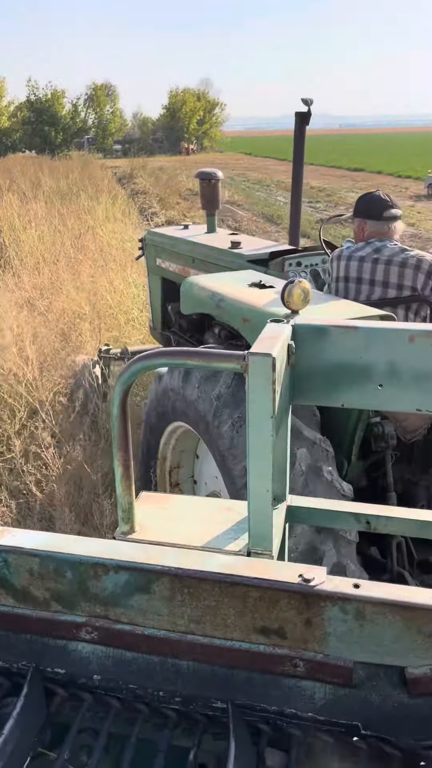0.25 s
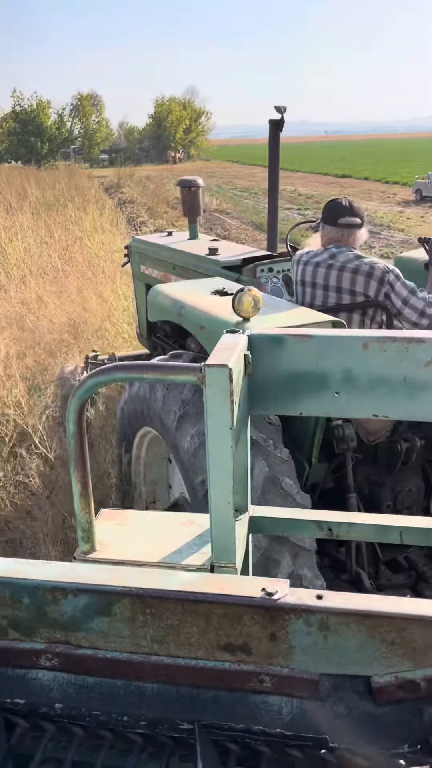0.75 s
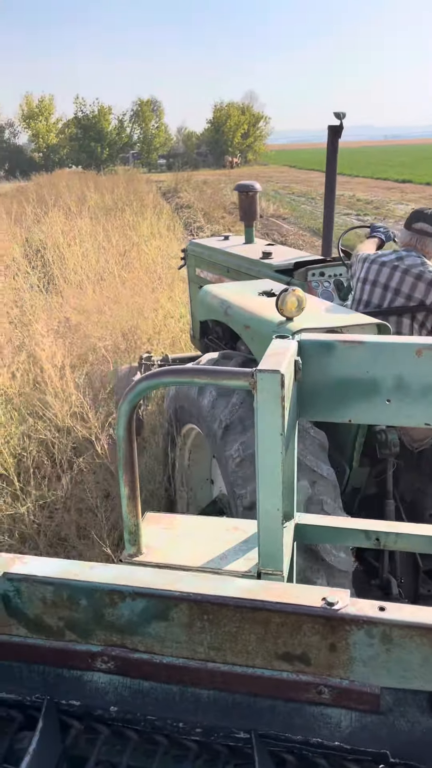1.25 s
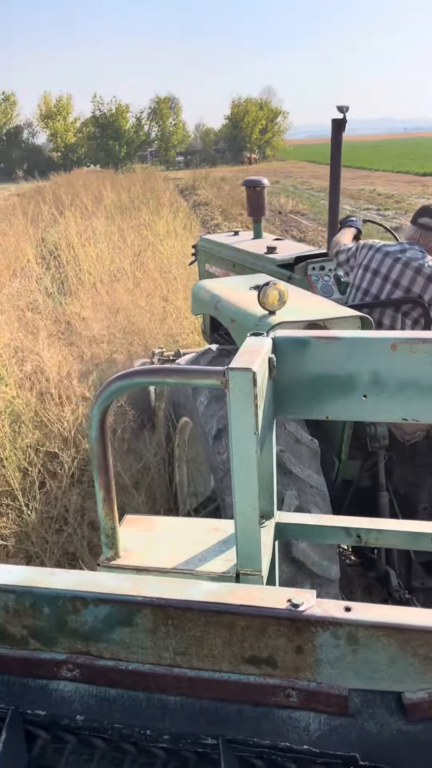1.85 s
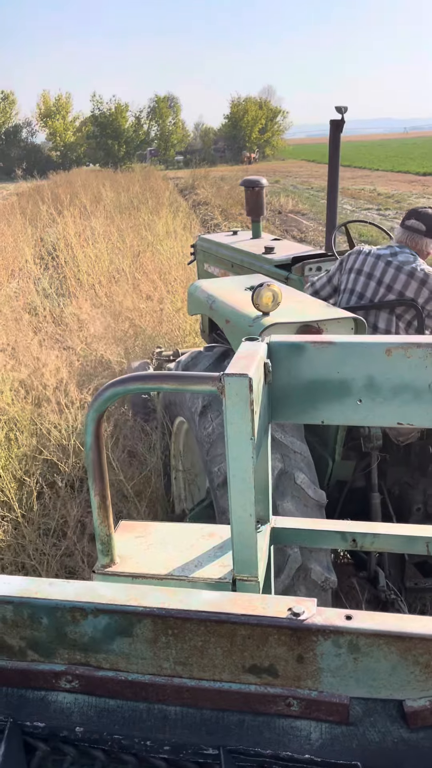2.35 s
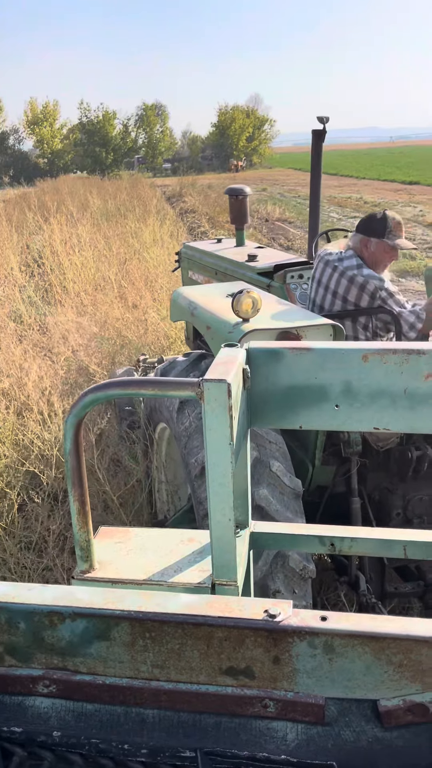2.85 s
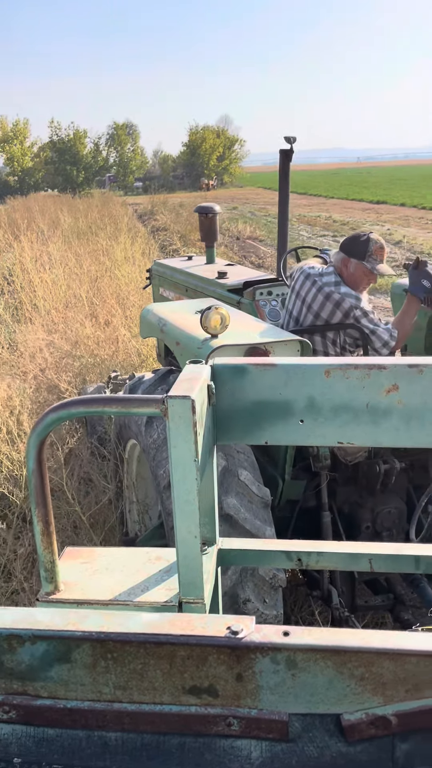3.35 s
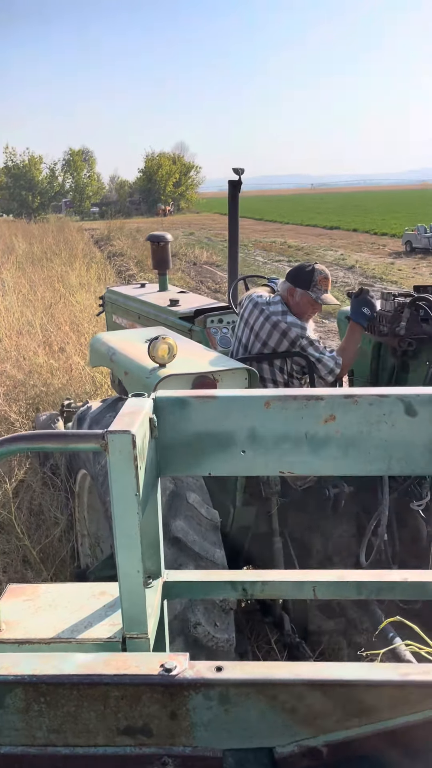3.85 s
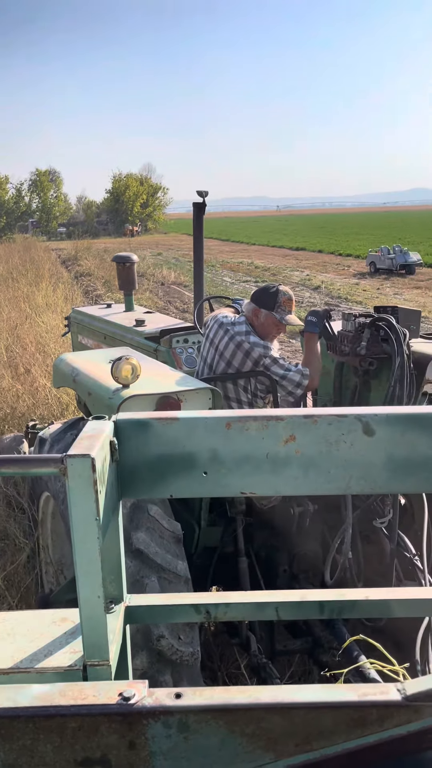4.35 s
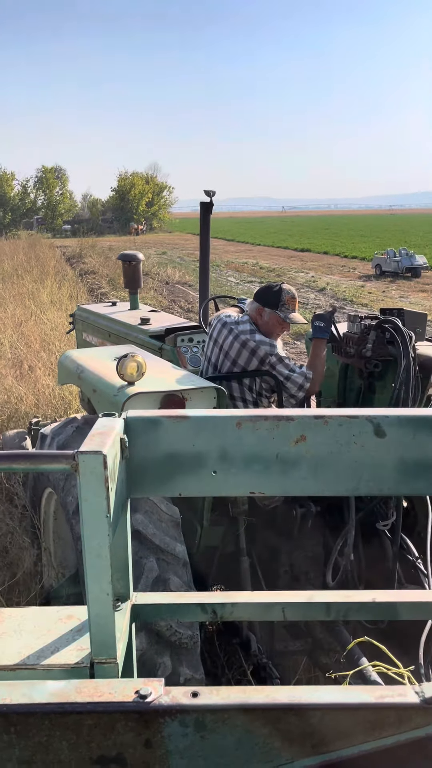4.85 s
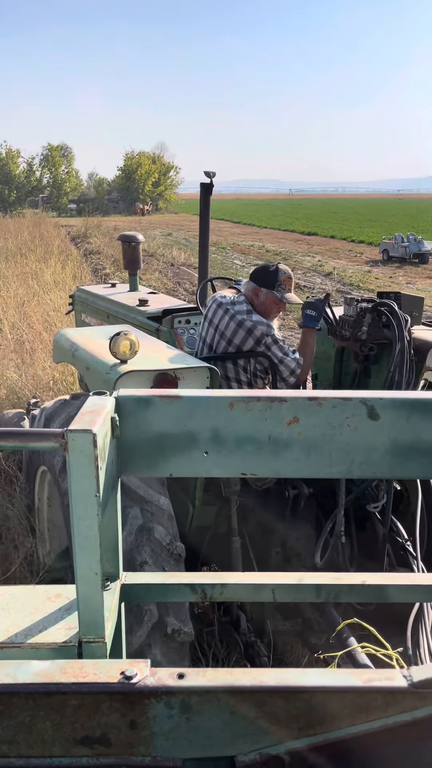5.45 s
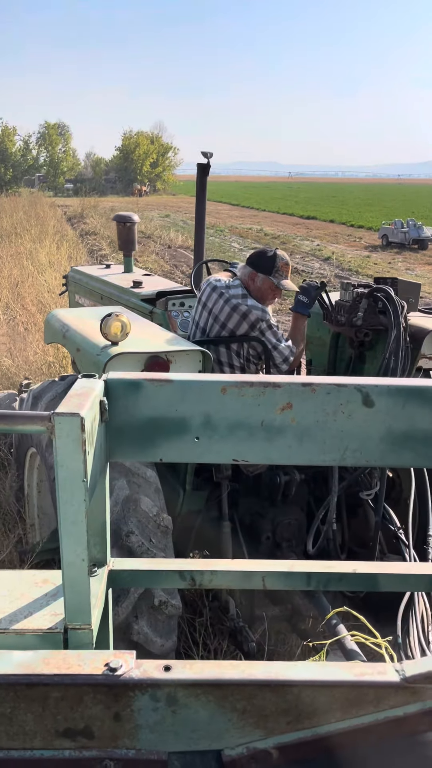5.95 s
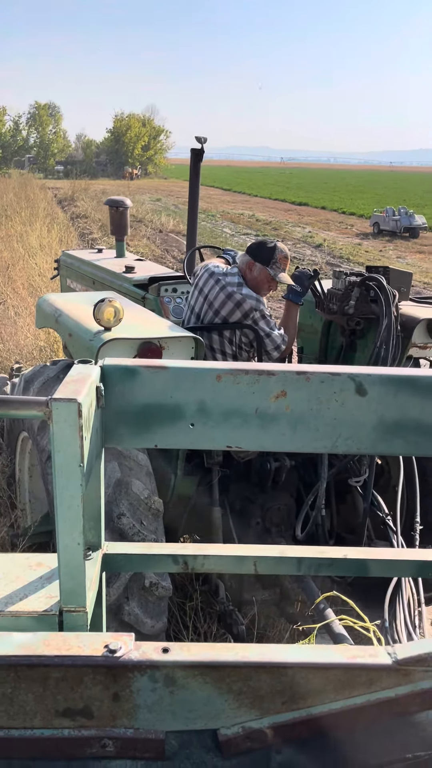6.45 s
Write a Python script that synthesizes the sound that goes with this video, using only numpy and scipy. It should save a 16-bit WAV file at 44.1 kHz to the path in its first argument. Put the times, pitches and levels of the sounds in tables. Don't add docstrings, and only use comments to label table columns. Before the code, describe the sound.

A continuous wall of farm machinery outdoors: rapid diesel throbbing, rough mid-range clatter and hissing chains, with a thin fluttering whine above. The sound starts fuller, thins around one second, then gains body and a brief stalk hiss near two. The low drone jumps forward briefly after three seconds, recedes, and returns late with a hard metallic jolt. A handheld phone on the deck hears it close, its bass pumping and stereo image shifting.

```python
import sys
import numpy as np
from scipy import signal
from scipy.fft import rfft, irfft, next_fast_len
from scipy.io import wavfile

SR = 44100
rng = np.random.default_rng(int(sys.argv[2]) if len(sys.argv) > 2 else 0)


def ratio(d):
    e = np.asarray(d, float) / 20
    return 10 ** e


def digitize_waveform(pressure):
    field = np.atleast_2d(pressure).T
    bounded = np.clip(field, -1, 1)
    quanta = np.round(bounded * 32767).astype(np.int16)
    wavfile.write(sys.argv[1], SR, quanta)


N = 294837
STEP = 20
PAD = STEP * next_fast_len(N // STEP + 200)
HZ = np.maximum(np.arange(PAD // 2 + 1) * SR / PAD, 1)
TIME = np.arange(PAD // STEP) * STEP / SR
DRONE_DB = -32.5


def in_time(rows):
    start_s, *columns = np.transpose(rows)
    return np.array([np.interp(TIME, start_s, column) for column in columns])


def at_hz(points, hz, column=1):
    points = np.array(points)
    return np.interp(np.log(hz), np.log(points[:, 0]), points[:, column])


def full_rate(control):
    return np.interp(np.arange(N) / STEP, np.arange(len(TIME)), control)


def drift(rate_hz):
    r = np.exp(-2 * np.pi * rate_hz * STEP / SR)
    slow = signal.lfilter([1], [1, -2 * r, r * r], rng.standard_normal(len(TIME) + 2000))[2000:]
    return slow / slow.std()


def tone(pitch_hz, gain):
    return full_rate(gain) * np.cos(2 * np.pi * np.cumsum(full_rate(pitch_hz)) / SR)


def struck(hits, modes, scatter_db=6.0):
    out, hits = np.zeros(N), np.array(hits)
    scatter = rng.normal(0, scatter_db, (len(hits), len(modes)))
    for k, (hz, level_db, t60_s) in enumerate(modes):
        clicks = np.full(N, 1e-18)
        clicks[(hits[:, 0] * SR).astype(int)] = ratio(hits[:, 1] + level_db + scatter[:, k])
        r, w = ratio(-60 / (t60_s * SR)), 2 * np.pi * hz / SR
        out += signal.lfilter([0, np.sin(w)], [1, -2 * r * np.cos(w), r * r], clicks)
    return out


# start_s, gain_db, opening_db
RIDE = [(0.0, -23.5, -14), (0.03, -24.5, -17), (0.99, -31, -12), (1.4, -32.5, -12.5), (1.77, -28, -8.5),
        (1.84, -28.5, -6.5), (1.9, -27, -7), (2.85, -26.5, -6.5), (3.0, -26, -4), (3.1, -26.5, -1.5),
        (3.8, -26, -4), (3.87, -25.5, -10), (4.65, -28, -13), (4.97, -26.5, -5.5), (5.75, -27, -2),
        (5.81, -26, -5), (6.69, -26.5, 2)]
# start_s, hold_s, lift_db
SWELLS = [
    (3.165, 0.413, 14),
    (6.27, .5, 12),
]
# start_s, hold_s, depth_db
DUCKS = [
    (0.898, 0.63, -2.5),
    (3.945, 0.61, -2),
]
# pitch_hz, gain_share, opening_share, swell_share, turn_db, duck_share, start_db
ANSWER = [(81, 1.55, 0.63, 0.7, -2.5, -0.34, 3), (151, 2, 0.93, 0.46, -0.5, 0.086, -1),
          (190, 1.4, 0.82, 0.033, 2.5, 0.32, 3), (346, 1.15, 0.91, -0.12, 1, 1, 3),
          (543, 1.2, 0.74, -0.15, -1, -0.71, -6.5), (730, 0.6, 0.21, 0.069, 1.3, -0.36, 6),
          (1490, 1.3, -0.18, 0.072, 1.5, 0.17, -8), (2060, 0.84, 0.056, -0.048, 0.9, 0.26, 3),
          (3980, 0.85, -0.38, 0.23, 4, -0.34, -1), (5700, 0.65, 0.2, -0.022, 1.5, 0.084, 5),
          (10400, 0.028, 0.0057, -0.072, -1, 0.2, 4)]


def registers():
    gain_db, opening_db = in_time(RIDE)
    swell_db, duck_db = 0, 0
    for start_s, hold_s, lift_db in SWELLS:
        corners_s = np.cumsum([0, .05, .13, hold_s, .035])
        swell_db = swell_db + lift_db * np.interp(TIME - start_s, corners_s, [0, .7, 1, 1, 0])
    for start_s, hold_s, depth_db in DUCKS:
        corners_s = np.cumsum([0, .096, hold_s, .096])
        duck_db = duck_db + depth_db * np.interp(TIME - start_s, corners_s, [0, 1, 1, 0])
    turn_s, turn_takes_s, settle_s = 4.49, 0.79, 0.45
    turned = np.clip((TIME - turn_s) / turn_takes_s, 0, 1)
    start = np.exp(-(TIME / settle_s) ** 2)
    swing_db = np.array(ANSWER)[:, 1:] @ [gain_db, opening_db, swell_db, turned, duck_db, start]
    return swing_db - swing_db.mean(axis=1, keepdims=True)


def level_at(hz):
    number = np.arange(len(ANSWER))
    where = np.interp(np.log(hz), np.log(np.array(ANSWER)[:, 0]), number)
    return np.maximum(1 - abs(where - number), 0) @ registers()


# start_s, tractor_cycles_per_s, harvester_turns_per_s
SPEED = [(0, 12.549, 34.3), (.515, 12.62, 33.686), (1.029, 12.652, 33.032), (1.544, 12.657, 32.429),
         (2.058, 12.642, 31.999), (2.573, 12.687, 31.91), (3.088, 12.636, 31.903), (3.602, 12.574, 31.876),
         (4.117, 12.557, 31.922), (4.632, 12.542, 31.985), (5.146, 12.621, 32.064), (5.661, 12.659, 32.136),
         (6.175, 12.621, 32.17), (6.69, 12.548, 32.168)]


def shafts():
    cycle, turn = np.cumsum(in_time(SPEED), axis=1) * STEP / SR
    return cycle + .012 - .09, turn + .045


def exhaust(turns, orders, cylinders, base_hz, rough_db):
    out = 0
    for k, db in orders:
        k = round(k)
        phase = rng.uniform(0, 2 * np.pi) if k % cylinders else 1.2 * (k > cylinders)
        rough = rough_db * np.sqrt(k / cylinders) * drift(4.9)
        gain = ratio(db + DRONE_DB + level_at(min(k * base_hz, 200)) + rough)
        out = out - np.sqrt(2) * gain * np.cos(2 * np.pi * k * turns + phase)
    return STEP * irfft(rfft(out), PAD)[:N]


# multiple_of_cycle, level_db
TRACTOR_ORDERS = [(4, -26), (5, -23), (6, -1), (7, -24), (8, -18), (9, -21), (10, -17), (11, -23),
                  (12, -9.5), (14, -19), (15, -10), (16, -17), (18, -11.5), (19, -19), (20, -20), (22, -24),
                  (24, -23), (25, -24), (28, -23), (29, -23), (30, -23)]


def tractor(cycle):
    return exhaust(cycle, TRACTOR_ORDERS, cylinders=6, base_hz=12.6, rough_db=1.4)


# multiple_of_turn, level_db
HARVESTER_ORDERS = [(2, -14), (3, -9), (4, -20), (5, -24), (7, -22), (11, -25)]
# start_s, level_db
HARVESTER_LOAD = [(0, -3), (.25, -10), (.75, -8), (.9, 0), (6.69, 0)]


def harvester(turn):
    load = full_rate(ratio(in_time(HARVESTER_LOAD)[0]))
    return -load * exhaust(turn, HARVESTER_ORDERS, cylinders=3, base_hz=32, rough_db=.8)


# pitch_hz, level_db, t60_s
BLOCK = [(640, -2, .02), (820, 0, .02), (1150, -1, .018), (1400, 0, .015), (1700, 0, .015),
         (2050, -1, .012)]


def combustion(cycle):
    times = TIME[1:][np.diff(np.floor(6 * cycle)) > 0]
    times = times[(times > 0) & (times < N / SR - .01)]
    knock_db = -40 + 0 * times
    return full_rate(ratio(level_at(1200))) * struck(np.transpose([times, knock_db]), BLOCK, 5)


CYLINDER_PUFF_DB = [3, 4.1, 4.8, 2.8, 3.9, 4.6]
# multiple_of_cycle, level_db, phase_rad
LOPE = [(1, .55, -1.2), (2, .85, 3.1), (3, .35, 1.6)]


def puffs(cycle, sharp):
    firing = 6 * cycle + .5
    number = np.floor(firing).astype(int) + 6
    strength = np.array(CYLINDER_PUFF_DB)[number % 6] + 0.55 * rng.standard_normal(600)[number]
    rise_db = strength * np.sin(np.pi * (firing % 1)) ** sharp
    for k, db, rad in LOPE:
        rise_db = rise_db + db * np.cos(2 * np.pi * k * cycle + rad)
    return rise_db - rise_db.mean()


# from_hz, to_hz, lead_rad
LEAD_STEPS = [(2000, 2700, 1.6), (2700, 4000, -.9), (4000, 5750, 2 * np.pi - .7), (6250, 8750, np.pi),
              (9620, 12100, np.pi)]


def port_lead():
    lead = 0
    for low, high, rad in LEAD_STEPS:
        climb = np.clip((HZ - low) / (high - low), 0, 1)
        lead = lead + rad * np.sin(np.pi / 2 * climb) ** 2
    return lead


# pitch_hz, level_db_per_hz
NOISE = [(45, -19), (110, -6), (205, 3.5), (260, 4.5), (450, -1), (700, 6.5), (1000, 2.5), (1500, 5.5),
         (2150, 3.5), (2950, -6.5), (4600, -7), (4900, -8.5), (7000, -5.5), (9000, -3), (10300, -7),
         (12200, -18)]
# pitch_hz, width_hz, level_db
BODY = [(384.5, 29, 5.5), (520, 68, 6), (595, 110, 2.5), (817, 106, 5.5), (954, 29, -7), (1126, 27, 5),
        (5470, 840, 7), (11300, 630, 6.5)]
# pitch_hz, likeness_0_to_1
LIKENESS = [(60, .99), (900, .9), (1000, .6), (1250, .88), (1400, .994), (5000, 1)]
# pitch_hz, puff_share
PUFF_SHARE = [(300, 0.033), (1500, 0.6), (3500, 0.46), (6000, 0.9), (11000, 1)]
# start_s, spread_s, treble_lift_db
SWISHES = [
    (1.82, 0.31, 3.5),
    (5.8, 0.12, -1.5),
]


def machinery(cycle):
    colour_db = at_hz(NOISE, HZ)
    for hz, width, db in BODY:
        colour_db = colour_db + db / (1 + (2 * (HZ - hz) / width) ** 2)
    alike = np.clip(at_hz(LIKENESS, HZ) - .33 * abs(np.sin(port_lead())) ** 0.3, 0, 1)
    white = rfft(rng.standard_normal((3, PAD)))
    field = ratio(colour_db) * (np.sqrt(alike) * white[0] + np.sqrt(1 - alike) * white[1:])
    together, out = drift(23.0), 0
    swish_db = sum(db * np.exp(-((TIME - s) / spread) ** 2) for s, spread, db in SWISHES)
    for place in np.arange(5, 14.5, .5):
        hz = 2 ** place
        slot = np.cos(np.pi * np.clip(np.log2(HZ) - place, -.5, .5)) ** 2
        late = .008 * np.log2(hz / 1500)
        flicker_db = puffs(cycle - late, sharp=1.2) + 0.044 * together + 1.63 * drift(37.0)
        gain_db = level_at(hz) + at_hz(PUFF_SHARE, hz) * flicker_db
        gain_db += swish_db * np.clip(np.log2(hz / 2500), 0, 1) * (hz < 9000)
        out = out + full_rate(ratio(gain_db)) * irfft(slot * field, PAD)[:, :N]
    return ratio(-25) * out / out.std()


# start_s, blade_pitch_hz, level_db
TURBO = [(0, 11530, -41), (.75, 11440, -38), (1.5, 11230, -35), (2.1, 11020, -35.5), (2.9, 10940, -36),
         (3.3, 11070, -42), (3.9, 11200, -40.5), (4.5, 11300, -41), (5.1, 11560, -37.5),
         (5.7, 11320, -38.5), (6.3, 11200, -39), (6.69, 11230, -35)]
# start_s, pitch_hz, level_db
WHINE = [(0, 5780, -46), (1.5, 5705, -48), (2.1, 5654, -39), (2.3, 5646, -38), (2.9, 5596, -38),
         (3.3, 5586, -37), (3.5, 5606, -37), (3.7, 5640, -38), (4.3, 5697, -41), (5.1, 5755, -45),
         (5.8, 5665, -43), (6.3, 5641, -41), (6.69, 5643, -41)]


def turbo(cycle):
    hz, db = in_time(TURBO)
    whine_hz, whine_db = in_time(WHINE)
    kick = np.cos(12 * np.pi * cycle)
    pulse = np.cos(12 * np.pi * cycle - .95)
    hz = hz + 430 * (1 + .25 * drift(30)) * kick + 130 * drift(90)
    db = db + 2 * pulse + 3 * drift(80)
    whine_hz = whine_hz - 75.6 + 210 * kick + 8 * drift(6)
    whine_db = whine_db + 4 * pulse + 2 * drift(15)
    return tone(hz, ratio(db)) + tone(whine_hz, ratio(whine_db))


# start_s, pitch_hz, level_db
FAN = [(0, 194.5, -17), (1.3, 194, -17), (1.7, 195, -8), (3.1, 195.5, -8), (3.5, 193.2, -9),
       (3.9, 192, -15), (4.8, 191.7, -13), (5.3, 192, -8), (5.8, 193.5, -8), (6.05, 193, -14),
       (6.3, 193, -8), (6.69, 193, -8)]


def fan():
    hz, db = in_time(FAN)
    return tone(hz, np.sqrt(2) * ratio(DRONE_DB + db + level_at(194) + 2.5 * drift(9)))


# pitch_hz, level_db, t60_s
GUARDS = [(388, -4, .2), (520, -1, .2), (655, 0, .2), (775, 1, .2), (860, -1, .2), (1008, -1, .2),
          (1162, -1, .18), (1283, -4, .18), (1375, -4, .16), (1495, -4, .16), (1675, -4, .15),
          (1985, -5, .15), (2170, -5, .14), (2480, -7, .14), (2592, -9, .14), (2830, -12, .12)]


def rattle(per_s, level_db):
    times = np.sort(rng.uniform(0, N / SR - .01, round(per_s * N / SR)))
    strength_db = level_db + 1.6 * np.minimum(rng.exponential(1, len(times)), 2.5)
    return full_rate(ratio(level_at(1130))) * struck(np.transpose([times, strength_db]), GUARDS, 4.9)


# start_s, level_db
TINKLES = [(.071, -59), (.547, -58), (.99, -53), (2.132, -43), (3.5, -52), (3.63, -69), (3.83, -61),
           (4.35, -54), (4.6, -61), (4.77, -50), (4.801, -41.5), (5.45, -51), (5.576, -42), (6.3, -70),
           (6.5, -50)]
# pitch_hz, level_db, t60_s
LINK = [(8266, 18, 0.28), (8100, -3, .1)]


def tinkle():
    return struck(TINKLES, LINK)


# start_s, level_db
KNOCKS = [
    (6.4465, -17.5),
    (6.463, -25),
    (6.512, -29),
]
# pitch_hz, level_db, t60_s
FRAME = [(615, 2, .05), (830, -8, .07), (1520, -4, .05), (1674, -13, .2), (2073, -14, .08)]
# start_s, level_db
BOUNCES = [
    (6.461, -21),
    (6.486, -20),
    (6.497, -22),
]
# pitch_hz, level_db, t60_s
RAIL = [(478, -3, .06), (520, 0, .09)]


def bump():
    left_right_db = np.array([[3.], [-5.]])
    return ratio(left_right_db) * (struck(KNOCKS, FRAME, 1.5) + struck(BOUNCES, RAIL, 1.5))


# pitch_hz, way_1_rad, way_2_rad, way_3_rad
STEER_LEAD = [(90, 0, 0, -1.1), (150, -.1, -.1, -1.8), (220, -.2, -1, -2), (320, -.1, -2, -1.2),
              (400, -.4, -3.5, -.5), (470, -.7, -4, -.5), (550, -1.1, -5.5, -1), (650, -.8, -5.7, -.9),
              (800, 0, -5.8, -.15), (1000, 0, -6.28, 0)]
# pitch_hz, way_1_db, way_2_db, way_3_db
STEER_DB = [(90, 0, 0, -3), (150, 0, 0, 0), (220, 0, -1.5, 1), (320, 0, -7, 3), (400, 0, -9, 1),
            (520, 0, 0, 0), (650, -4, -6, -6), (900, -1, -4, -2), (1100, -4, -6.5, -4.5), (1350, 0, 0, 0)]
# start_s, way_1_share, way_2_share, way_3_share
STEERING = [(0, 1, 0, 0), (.75, 1, 0, 0), (.92, .2, .1, .7), (1.1, 0, .6, .4), (1.5, 0, 1, 0),
            (3.65, 0, 1, 0), (4.05, 0, .4, .6), (4.4, 0, 0, 1), (6.69, 0, 0, 1)]
TOP_HZ = [12700, 12050, 12300]
# pitch_hz, level_db
PORT_DB = [(2000, 0), (2300, -3), (2600, -1), (4000, .5), (4600, -1), (5050, -2), (5400, 0)]


def ports(x):
    spectrum, lead, out = rfft(x, PAD), port_lead(), 0
    for way, share in enumerate(in_time(STEERING)):
        half = ratio((at_hz(PORT_DB, HZ) + at_hz(STEER_DB, HZ, way + 1)) / 2)
        late = np.exp(-1j * (lead + at_hz(STEER_LEAD, HZ, way + 1)))
        dulled = spectrum / (1 + (HZ / TOP_HZ[way]) ** 22.0)
        out = out + full_rate(share) * irfft(dulled * [half, late / half], PAD)[:, :N]
    return out


def scene():
    cycle, turn = shafts()
    direct = tractor(cycle) + harvester(turn) + combustion(cycle)
    direct += turbo(cycle) + fan()
    direct += rattle(per_s=80, level_db=-47.5) + tinkle()
    return direct + bump() + machinery(cycle)


def roll_off(x):
    return signal.sosfilt(signal.butter(12, 13090, fs=SR, output="sos"), x)


def record(dry):
    mix = ports(dry)
    return roll_off(mix)


dry = scene()
out = record(dry)
digitize_waveform(out)
```